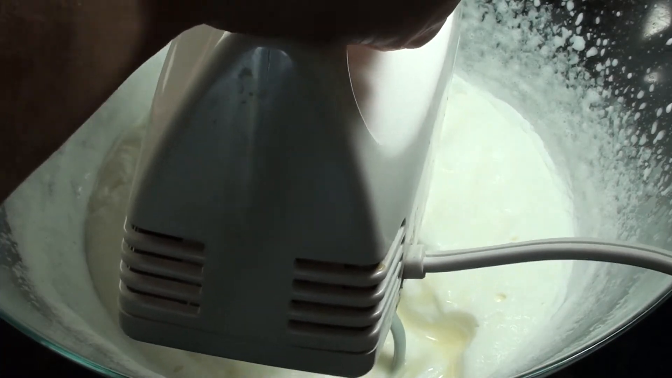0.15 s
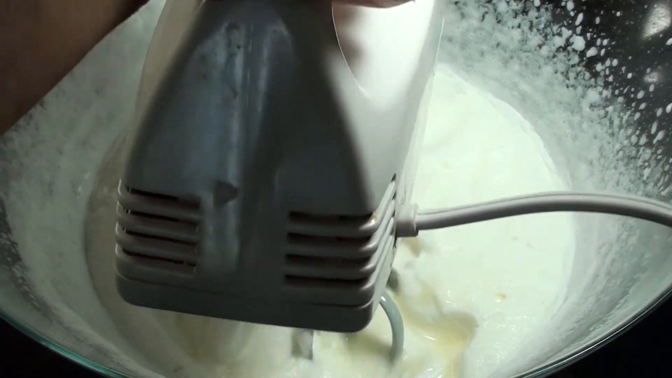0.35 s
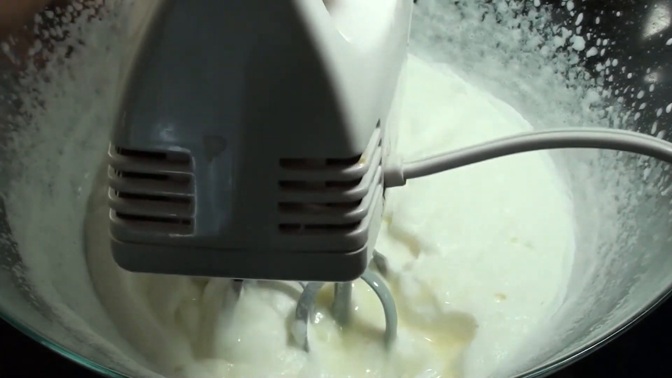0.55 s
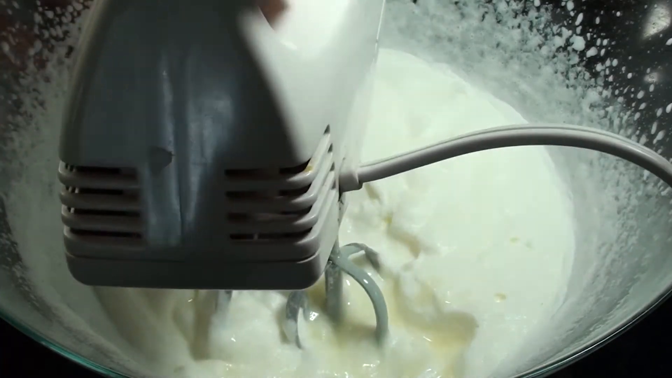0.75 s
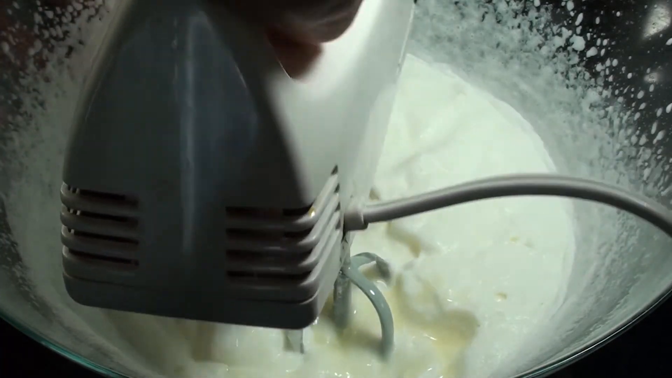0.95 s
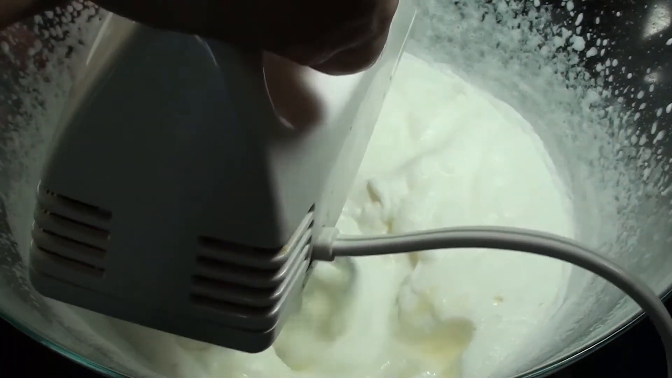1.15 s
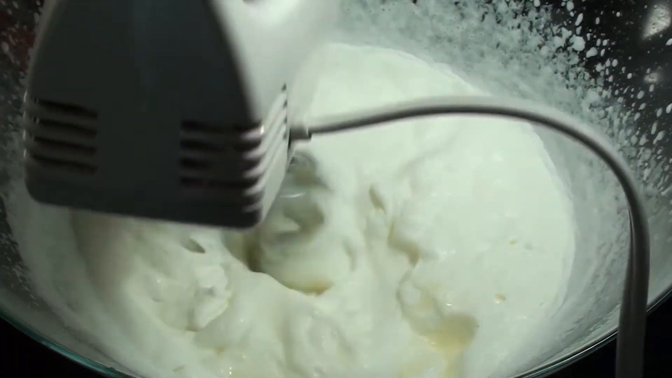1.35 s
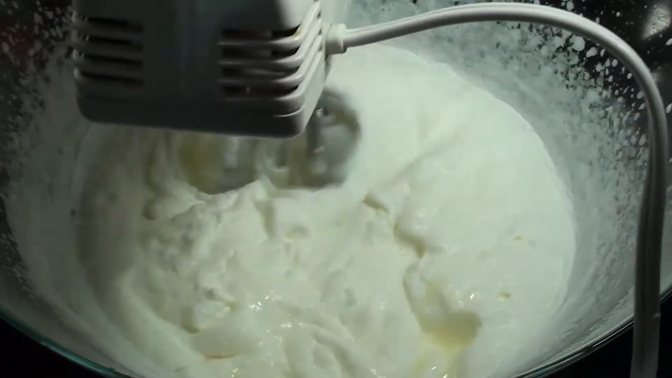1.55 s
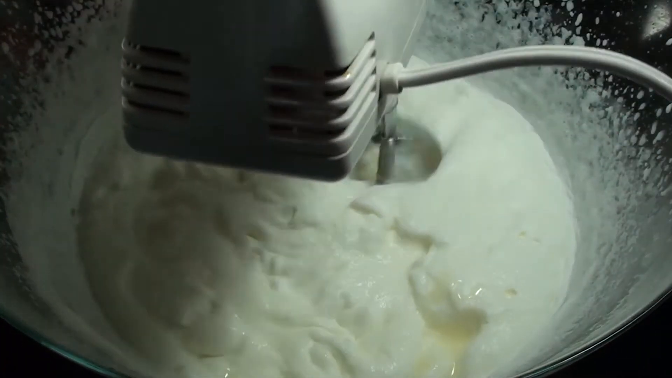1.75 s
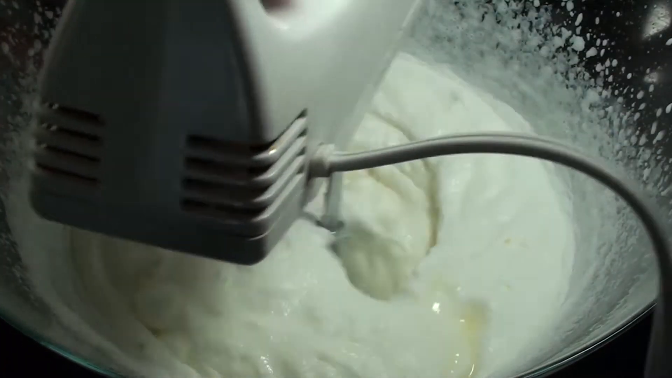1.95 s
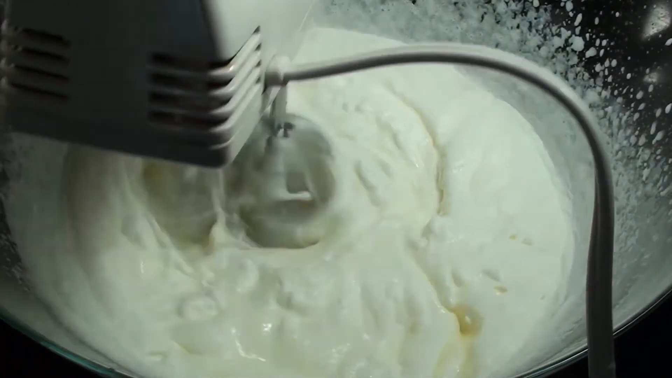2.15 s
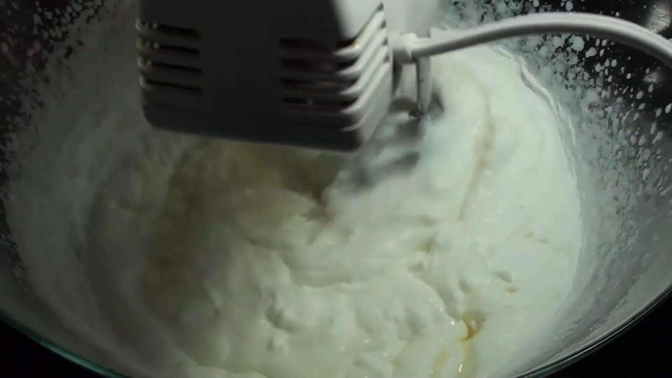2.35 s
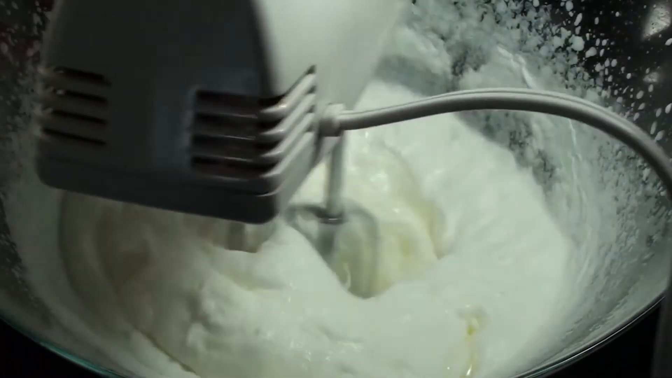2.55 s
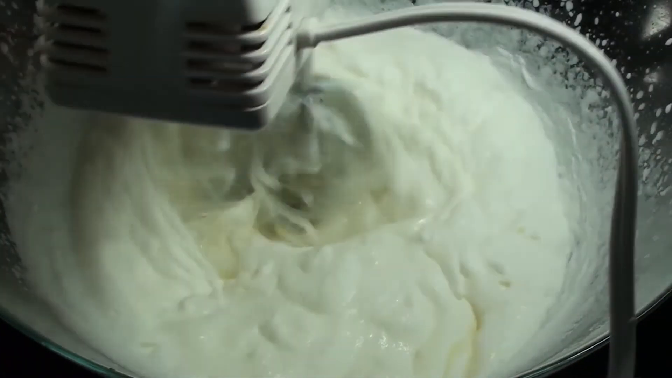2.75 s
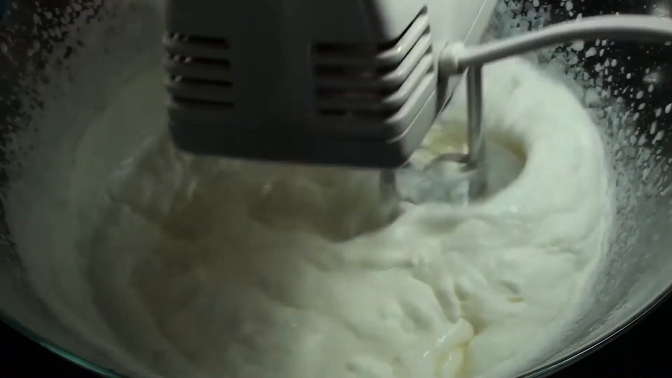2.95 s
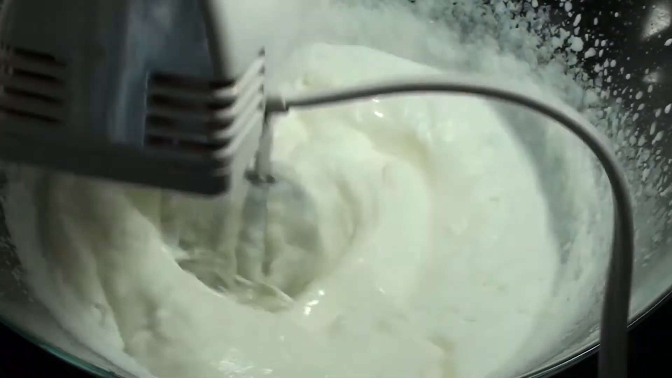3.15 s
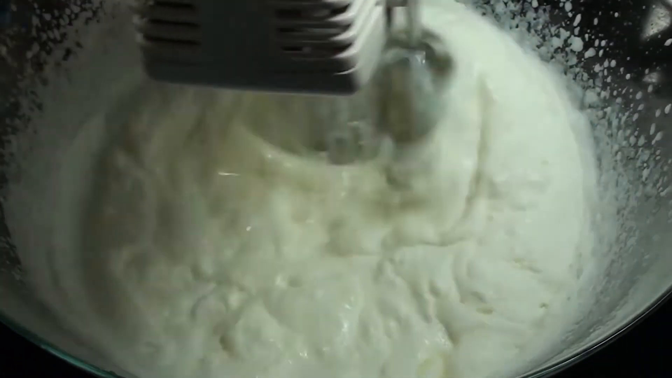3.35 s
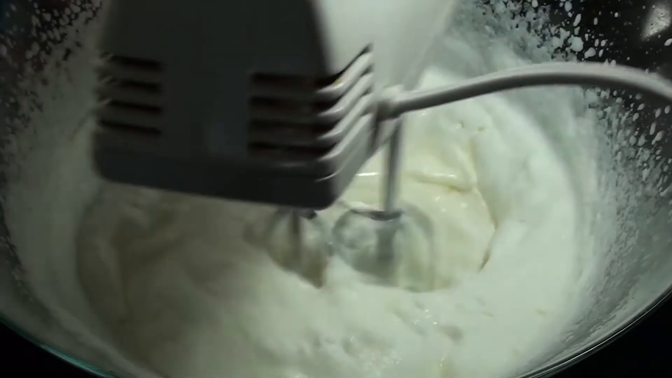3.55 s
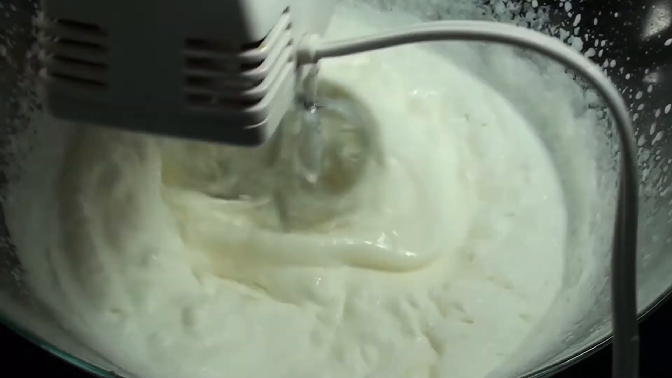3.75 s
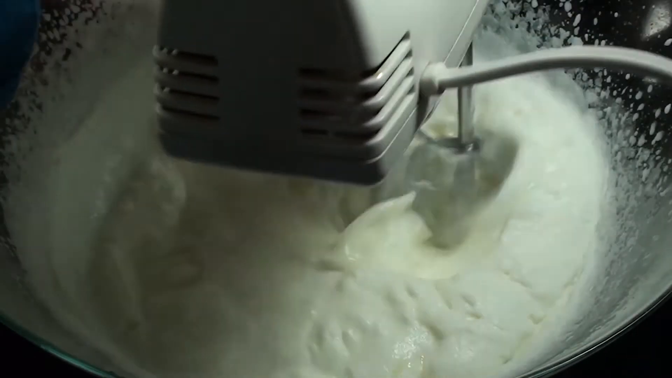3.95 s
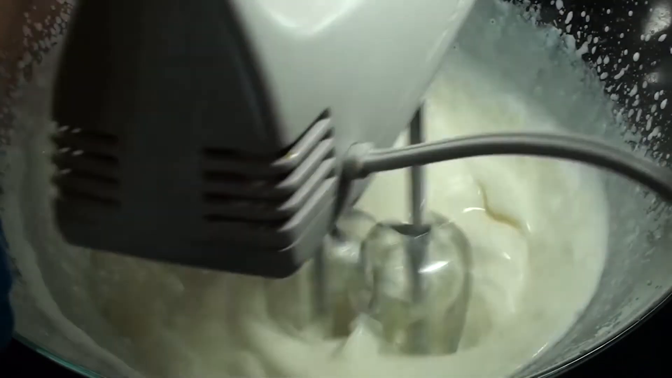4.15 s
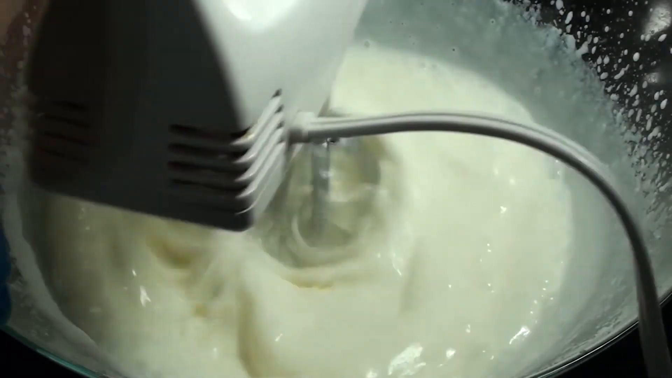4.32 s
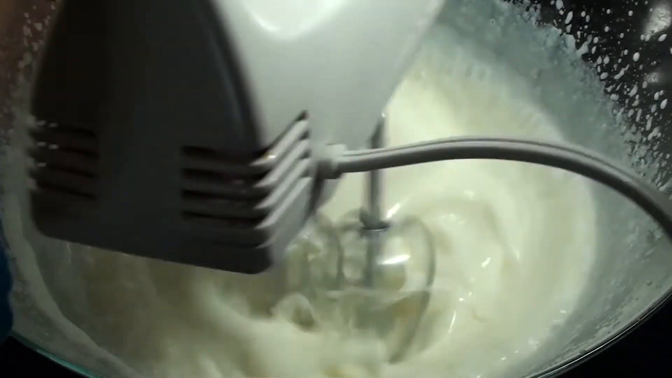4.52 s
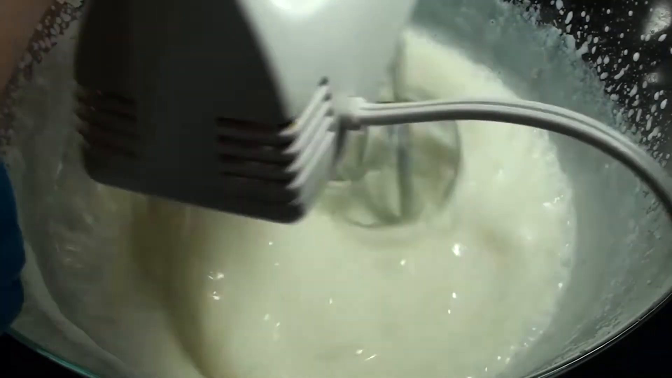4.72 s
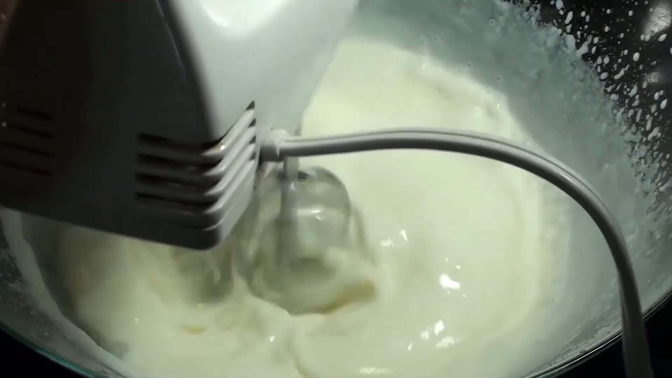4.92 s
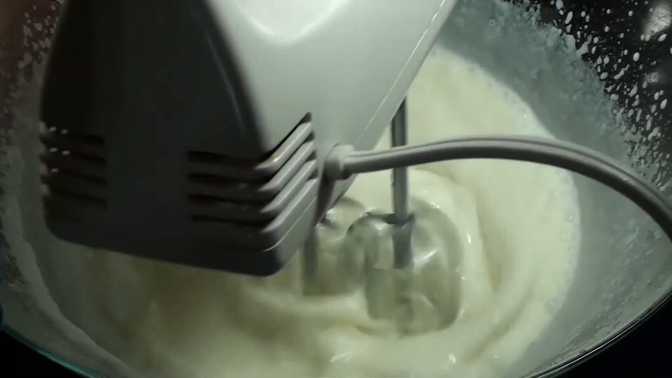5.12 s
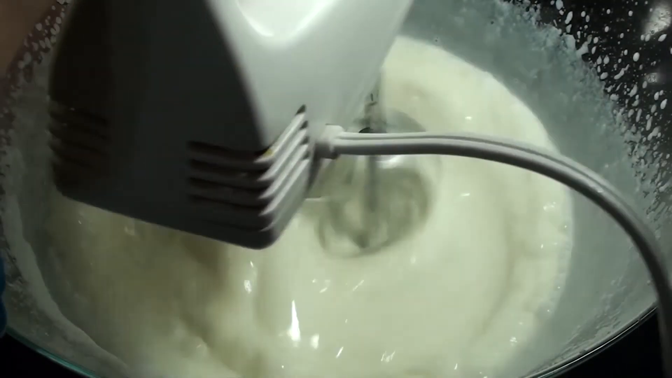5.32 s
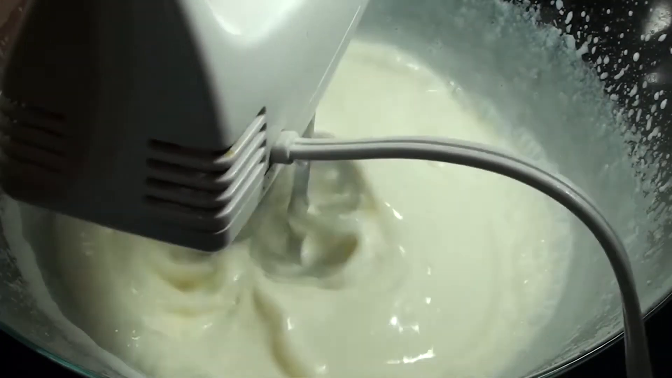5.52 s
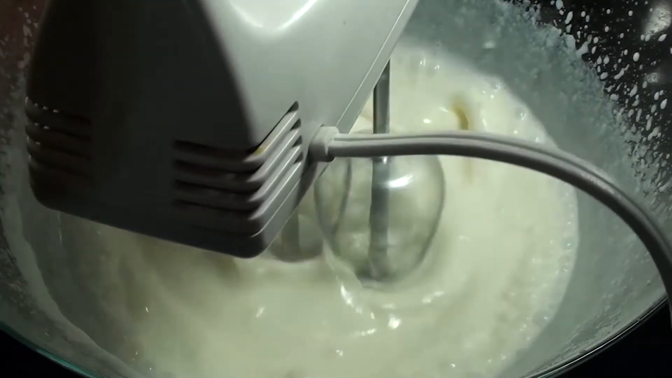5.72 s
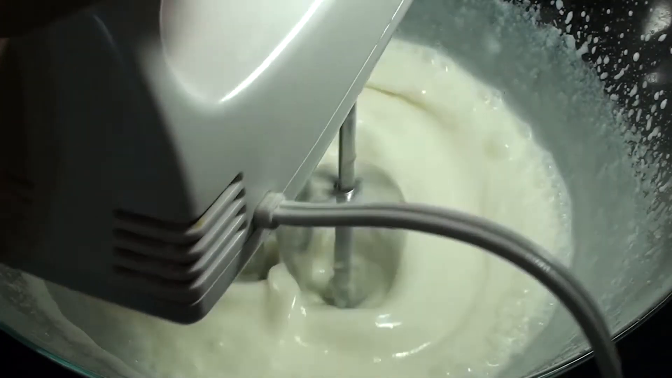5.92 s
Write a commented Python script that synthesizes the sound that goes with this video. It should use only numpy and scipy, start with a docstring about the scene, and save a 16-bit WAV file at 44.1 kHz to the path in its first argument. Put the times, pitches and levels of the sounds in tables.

```python
"""In a quiet kitchen, close by, an electric hand mixer whips cream in a glass bowl.
It is switched on, spins up, and is later clicked one setting faster. The motor whines at multiples of
its turning speed, gears rattle in the plastic casing, and the motor's carbon brushes hiss. The steel
beaters churn the cream and now and then chatter against the bowl. Appliances hum faintly behind it."""
import sys
import numpy as np
from scipy import signal
from scipy.fft import rfft, irfft, next_fast_len
from scipy.io import wavfile
from scipy.ndimage import uniform_filter1d, map_coordinates

SR = 44100
rng = np.random.default_rng(int(sys.argv[2]) if len(sys.argv) > 2 else 0)


def to_wav(sig):
    """Store sig (one row per channel, or 1-D mono) as 16-bit WAV at the path in sys.argv[1].

    Samples outside -1..1 are clipped; the rate is SR.
    """
    pcm = np.clip(np.atleast_2d(sig), -1, 1) * 32767
    pcm = np.round(pcm).astype(np.int16)
    wavfile.write(sys.argv[1], SR, pcm.T)  # frames by channels


N = 268236

# Levels in the tables are relative. A fade_s is the time a sound takes to die away by 60 dB.
# The cream slows the motor as the beaters are moved around: time_s, lost_turns_per_s
CREAM_DRAG = [(1.35, 10), (1.65, 2), (2.08, 7), (2.3, 4.3), (2.85, 6), (3.05, 2.2), (3.6, 2.4), (3.8, 6.5),
              (4.25, 6), (4.9, 9), (5.6, 8.6), (5.95, 4.7)]
# The fast setting shakes the gears harder: time_s, shake_0_to_1
GEAR_SHAKE = [(4.11, 0.36), (4.14, 0.7), (5.65, 0.79), (6.08, 0.43)]
# Resonances, pitches at which the rising whine swells: pitch_hz, width_hz, boost_db
WHINE_RESONANCES = [(2030, 130, 14), (2813, 386, 16)]
# Tones of the spinning shaft: cycles_per_turn, calm_level_db, full_shake_level_db
SHAFT_TONES = [(1, -37, -36.5), (2, -43, -39), (3, -40, -34.5), (4, -42, -24), (5, -35.5, -22),
               (6, -33, -73), (7, -28, -30), (12, -35, -28.5), (16, -32.5, -34), (17, -50, -36),
               (21, -38, -34.5), (24, -40, -25), (26, -50, -36), (31, -69, -31), (36, -45.5, -47),
               (38, -52, -60)]
# How well the brush holders pass the motor's whistle: pitch_hz, gain_db
WHISTLE_RESPONSE = [(3500, -24.5), (6800, 7.5), (8200, -2), (10200, 1), (12200, 0.5), (13000, -4)]
# Tone colour of the rattling gears, hissing brushes and churned cream: pitch_hz, level_db
GEAR_SPECTRUM = [(500, -38), (900, -16), (1150, -5), (1420, -6.5), (1800, -4.5), (2100, -2.5), (2700, 2),
                 (3200, -0.5), (3700, -6.5), (6000, -20)]
BRUSH_SPECTRUM = [(1500, -37), (3400, 2.5), (4500, -0.5), (7200, 2.5), (8600, -2), (9400, -2), (10600, -9),
                  (12000, -10), (13000, -25.5), (16000, -44.5)]
CREAM_SPECTRUM = [(30, -70), (100, -18), (280, -14), (400, -9), (510, 2), (690, -4), (850, -6.5),
                  (1300, -1), (3000, -41)]
# How loud those three get: steady_db, strain_change_db, full_shake_change_db, speed_doubling_change_db
GEAR_LOUDNESS = (-20.5, 2.5, -1, 9)
BRUSH_LOUDNESS = (-25, 0.5, 2.5, 7.5)
CREAM_LOUDNESS = (-32.5, 3, -3, 2.5)
# Resonances of the plastic casing: pitch_hz, width_hz, boost_db
CASING_RESONANCES = [(1596, 72, 8), (2080, 236, 10.5), (2455, 39, 6), (5330, 790, 5)]
# A beater touches the bowl and brakes the gears: start_s, end_s, level_db, grip_0_to_1
BOWL_TOUCHES = [(1.057, 1.072, -19.5, 0), (1.099, 1.112, -15.5, 0.2), (1.131, 1.3, -16.5, 0.53),
                (1.347, 1.46, -14, 0.24), (2.04, 2.18, -12.5, 0.13), (2.453, 2.511, -26, 0.54),
                (2.652, 2.688, -11.5, 0.3), (3.104, 3.225, -15, .7), (3.666, 3.72, -12.5, 1)]
# The ringing of a beater that hits the bowl: pitch_hz, level_db, fade_s
BEATER_RING = [(5940, -1, 0.031), (6230, -1.5, 0.012), (8130, -6, 0.021), (8140, -1.5, 0.013),
               (8880, -11, 0.026), (10700, -13, 0.019)]
# Clicks of the switch and of the handle in the hand: start_s, level_db, pitch_hz, spread_octaves, fade_s
PLASTIC_CLICKS = [(.06, -33, 1490, 1.1, 0.042), (.082, -37, 1500, 1.3, 0.047), (.291, -41, 2900, .4, .04),
                  (.432, -33, 6500, .6, 0.022), (.605, -37, 1000, .8, 0.043),
                  (1.011, -19, 4000, 3.1, 0.065), (4.106, 2, 3000, 1.15, 0.095)]
# Tone colour of the kitchen's still air: pitch_hz, level_db
AIR_SPECTRUM = [(53, -48), (90, -12.5), (264, -13), (294, -6), (527, -11), (562, -8), (1170, -17.5),
                (1920, -23.5), (15500, -29.5)]
# The hum of kitchen appliances: pitch_hz, level_db
APPLIANCE_HUM = [(59.2, -58.5), (565, -64), (1954, -71)]
# Strength of the room's echoes against the direct sound: pitch_hz, level_db
ECHO_SPECTRUM = [(60, -68), (500, -13), (1200, -16.5), (4500, -16.5), (8000, -13.5), (12000, -72)]

SWITCH_ON_S, FASTER_AT_S, STRAIN_END_S = 1.012, 4.11, 2.05
SLOW_TURNS_PER_S, FAST_TURNS_PER_S = 384.4, 397  # the two settings, with nothing slowing the motor


def mixer(braked_db=-6):
    """One shaft drives it all: it spins up, steps to the faster setting, and is slowed by the cream."""
    pace, grip = spin_up(), bowl_grip()
    drag, shake = over_time(CREAM_DRAG), over_time(GEAR_SHAKE)
    strain = 1 - ramp(STRAIN_END_S, 0.092)  # the motor labours until it is nearly up to speed
    setting = SLOW_TURNS_PER_S + (FAST_TURNS_PER_S - SLOW_TURNS_PER_S) * ramp(FASTER_AT_S, 0.03)
    speed = pace * (setting - drag) * (1 + 0.000894 * wobble(45))  # turns a second
    turns = np.cumsum(speed) / SR
    force = tooth_force(turns, shake)
    noise = cream(noise_db(CREAM_LOUDNESS, pace, strain, shake))
    noise += gears(force, noise_db(GEAR_LOUDNESS, pace, strain, shake) + braked_db * grip)
    noise += brushes(force, noise_db(BRUSH_LOUDNESS, pace, strain, shake))
    tones = pace * whine(speed, turns, drag, grip) + shaft(speed, turns, shake)
    tones += strain * sparks(speed, turns, pace)
    return ramp(SWITCH_ON_S, 0.017) * (tones + noise + beaters(turns))


def spin_up(surge_s=0.14, creep_s=0.84, surge_share=0.664):
    """The share of full speed reached, 0 to 1: a quick surge and a slow creep."""
    t = np.maximum(clock() - SWITCH_ON_S, 1 / SR)
    return 1 - surge_share * np.exp(-t / surge_s) - (1 - surge_share) * np.exp(-t / creep_s)


def whine(speed, turns, drag, grip, per_turn=8):
    """The motor's main note swells as it climbs through each resonance; load on the beaters damps it."""
    level_db = -23 + boost_db(WHINE_RESONANCES, per_turn * speed) - 0.5264 * drag - 17 * grip
    return amp(level_db) * tone(turns, per_turn, flutter_db=1.9, rough=0.24)


def shaft(speed, turns, shake):
    """The slightly unbalanced shaft hums, with a row of faint, high overtones on top."""
    unbalance = np.clip(speed / 325, 0, 1) ** 4  # its force grows steeply with speed
    out = np.zeros(N)
    for per_turn, calm_db, shaken_db in SHAFT_TONES:
        level_db = calm_db + shake * (shaken_db - calm_db)
        smear = 0.28 + 0.016 * per_turn  # the loose shaft blurs high tones more
        out += amp(level_db) * tone(turns, per_turn, flutter_db=2.5, rough=smear, jitter_hz=110)
    overtones = amp(-50) * sum(tone(turns, per_turn) for per_turn in range(25, 50))
    return unbalance * (out + overtones)


def sparks(speed, turns, pace):
    """The motor's spinning contacts (the commutator) spark: a rough growl and a broken, rising whistle."""
    current = 1 - pace  # the starting current falls as the motor gains speed
    growl = ramp(1.055, 0.017) * amp(-40 + 36 * current ** 2)  # sparks begin once the shaft is turning
    growl *= tone(turns, per_turn=12, flutter_db=2.5, rough=1.5, jitter_hz=400)
    judder = 1.9 - 1.25 * np.clip(speed / 330, 0, 1)  # strongest while the shaft is slow
    whistle = np.zeros(N)
    for per_turn, level_db in [(24, 0), (36, 0), (48, -8), (60, -8)]:
        gain = amp(level_db + db_at(WHISTLE_RESPONSE, per_turn * speed))
        whistle += gain * tone(turns, per_turn, flutter_db=2.6, rough=judder, jitter_hz=330)
    return growl + amp(-32 + 9 * np.log2(pace)) * whistle


def tooth_force(turns, shake):
    """Gear teeth flip between loose and pressed, a little in step with the shaft."""
    contact = np.tanh(0.83 * wobble(1200) + 0.11 * np.cos(2 * np.pi * turns))
    force = amp((2 + 2 * shake) * contact)
    return force / np.sqrt(uniform_filter1d(force ** 2, size=4000))


def gears(force, level_db):
    """The meeting teeth rattle the casing."""
    knocks = rng.standard_normal(N) * force * amp(2 * wobble(70))
    return amp(level_db + 3) * through_casing(knocks, GEAR_SPECTRUM)


def brushes(force, level_db):
    """Carbon brushes and cooling air hiss, shaken by the gears."""
    hiss = rng.standard_normal(N) * force ** 0.47 * amp(1.08 * wobble(60))
    return amp(level_db + 3.5) * through_casing(hiss, BRUSH_SPECTRUM)


def cream(level_db):
    """The wires churn the thick cream in soft lumps."""
    lumps = rng.standard_normal(N) * amp(1.5 * wobble(60))
    return amp(level_db + 2.5) * through_casing(lumps, CREAM_SPECTRUM)


def beaters(turns, turns_per_wire=4.9, bounce_s=0.0064, bounce_db=-2.5):
    """While a beater touches the bowl, every passing wire strikes it and bounces once."""
    out = np.zeros(N)
    for start_s, end_s, level_db, _ in BOWL_TOUCHES:
        first, last = np.interp([start_s, end_s], clock(), turns)
        for hit_s in np.interp(np.arange(first, last, turns_per_wire), turns, clock()):
            for delay_s, drop_db in [(0, 0), (bounce_s * rng.uniform(0.6, 1.9), bounce_db)]:
                add(out, hit_s + delay_s, amp(level_db + drop_db - 3.5) * wire_strike())
    cushion = [(300, -2), (5000, 2.5), (9000, 3), (14000, -0.5)]  # cream pads the hit: pitch_hz, gain_db
    return filtered(out, lambda hz: amp(db_at(cushion, hz)))


def wire_strike(scatter_db=2.6):
    """Steel hits glass with a brief scuff and rings, never quite the same way twice."""
    t = np.arange(SR // 12) / SR
    ring = np.zeros(len(t))
    for pitch_hz, level_db, fade_s in BEATER_RING:
        fade = amp(level_db + rng.normal(0, scatter_db) - 60 * t / fade_s)
        ring += fade * np.sin(2 * np.pi * (pitch_hz * rng.normal(1, 0.017) * t + rng.random()))
    scuff = 0.5 * amp(-60 * t / 0.0099) * rng.standard_normal(len(t))
    return ring + scuff


def bowl_grip():
    """How firmly a beater dragging on the bowl takes the slack out of the gears, 0 to 1."""
    t = clock()
    touching = sum(grip * ((t > start_s) & (t < end_s)) for start_s, end_s, _, grip in BOWL_TOUCHES)
    return uniform_filter1d(np.clip(touching, 0, 1), size=1500)


def clicks(rise_s=0.0039):
    """The plastic switch and handle give short, dry snaps."""
    out, t = np.zeros(N), np.arange(SR // 8) / SR
    hz = np.fft.rfftfreq(len(t), 1 / SR)
    for start_s, level_db, pitch_hz, octaves, fade_s in PLASTIC_CLICKS:
        band = np.exp(-(np.log2((hz + 1) / pitch_hz) / octaves) ** 2 / 2)
        snap = unit(irfft(rfft(rng.standard_normal(len(t))) * band, len(t)))
        rise = (1 - np.exp(-t / rise_s)) ** 2
        add(out, start_s, amp(level_db - 60 * t / fade_s) * rise * snap)
    return out


def kitchen():
    """Still air and the steady hum of appliances."""
    noise = rng.standard_normal(N)
    air = filtered(noise, lambda hz: amp(db_at(AIR_SPECTRUM, np.maximum(hz, 90))) * hz / (hz + 60))
    hum = sum(amp(db) * np.sqrt(2) * np.sin(2 * np.pi * hz * clock()) for hz, db in APPLIANCE_HUM)
    return amp(-52) * unit(air) + hum


def room_echoes(x, fade_s=0.23):
    """The kitchen's faint echoes differ between left and right."""
    t = np.arange(SR // 3) / SR
    echoes = rng.standard_normal(len(t)) * amp(-60 * t / fade_s)
    side = signal.fftconvolve(x, echoes / np.linalg.norm(echoes))[:N]
    side = filtered(side, lambda hz: amp(db_at(ECHO_SPECTRUM, hz)))
    return np.array([x + side, x - side]) * amp([[-0.15], [0.15]])


def tone(turns, per_turn, flutter_db=5.5, rough=0.27, jitter_hz=70):
    """A tone locked to the shaft; slack in the bearings shakes its level and timing."""
    phase = 2 * np.pi * (per_turn * turns + rng.random()) + rough * wobble(jitter_hz)
    flutter = amp(flutter_db * (wobble(11) + 0.78 * wobble(60)))
    return unit(flutter * np.sin(phase))


def noise_db(loudness, pace, strain, shake):
    """A noise's level follows the speed, the strain of starting and the shaking."""
    steady_db, strain_db, shake_db, doubling_db = loudness
    return steady_db + strain_db * strain + shake_db * shake + doubling_db * np.log2(pace)


def through_casing(x, spectrum):
    """Give a noise its tone colour and the casing's resonances."""
    return unit(filtered(x, lambda hz: amp(db_at(spectrum, hz) + boost_db(CASING_RESONANCES, hz))))


def boost_db(resonances, hz):
    """How much the resonances add at each pitch."""
    return sum(db / (1 + (2 * (hz - centre) / width) ** 2) for centre, width, db in resonances)


def db_at(spectrum, hz):
    """Read a level between a table's pitches."""
    pitches, levels = np.transpose(spectrum)
    return np.interp(np.log(hz + 1), np.log(pitches + 1), levels)


def filtered(x, response):
    """Turn each frequency up or down by response(hz)."""
    size = next_fast_len(N + SR // 2)
    return irfft(rfft(x, size) * response(np.fft.rfftfreq(size, 1 / SR)), size)[..., :N]


def over_time(rows):
    """Join (time_s, value) points with straight lines."""
    return np.interp(clock(), *np.transpose(rows))


def wobble(rate_hz):
    """A smooth curve through rate_hz random values a second."""
    return map_coordinates(rng.standard_normal(int(N * rate_hz / SR) + 4), [clock() * rate_hz])


def ramp(start_s, length_s):
    """A straight rise from 0 to 1."""
    return np.clip((clock() - start_s) / length_s, 0, 1)


def add(track, start_s, sound):
    """Mix a short sound into a track."""
    part = track[round(start_s * SR):][:len(sound)]
    part += sound[:len(part)]


def clock():
    """The time of every sample, in seconds."""
    return np.arange(N) / SR


def amp(db):
    """Turn decibels into a multiplier."""
    return 10 ** (np.asarray(db) / 20)


def unit(x):
    """Scale to an average power of 1."""
    return x / np.sqrt(np.mean(x ** 2) + 1e-20)


def scene():
    """The mixer and its clicks in the kitchen, in stereo."""
    return room_echoes(amp(5.5) * mixer() + clicks() + kitchen())


def record(dry, threshold_db=-18, cut_share=0.57, ceiling=0.9, top_hz=15850):
    """Gain control turns loud moments down, peaks are rounded, and the highest treble is cut."""
    power = uniform_filter1d(np.mean(dry ** 2, axis=0), size=1300)
    excess_db = np.maximum(10 * np.log10(np.abs(power) + 1e-12) - threshold_db, 0)
    lowered = dry * amp(-cut_share * excess_db)
    rounded = lowered / (1 + np.abs(lowered / ceiling) ** 6) ** (1 / 6)
    return filtered(rounded, lambda hz: hz < top_hz)


dry = scene()
out = record(dry)
to_wav(out)
```